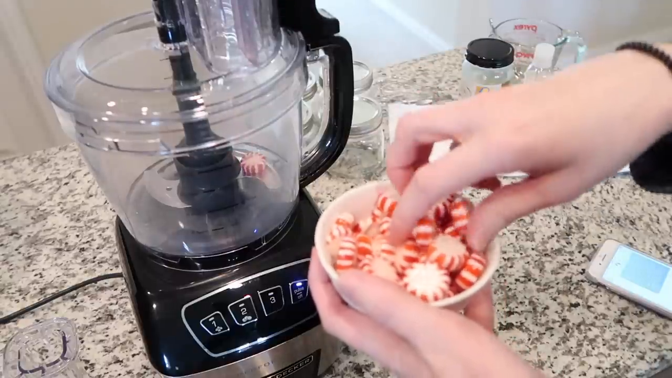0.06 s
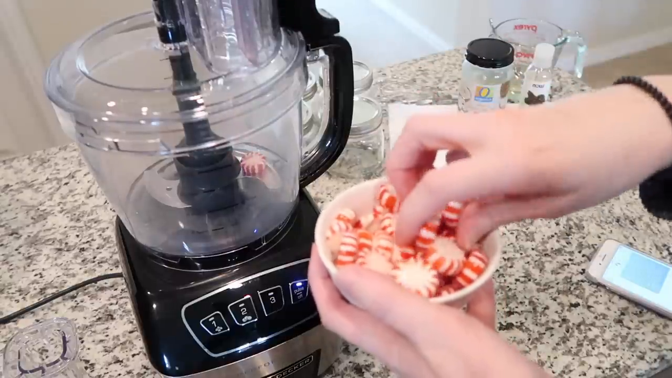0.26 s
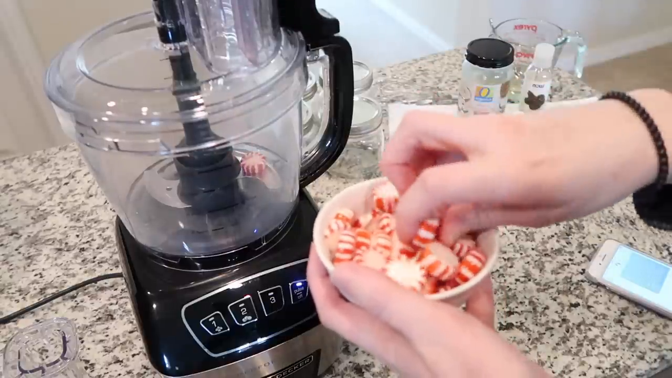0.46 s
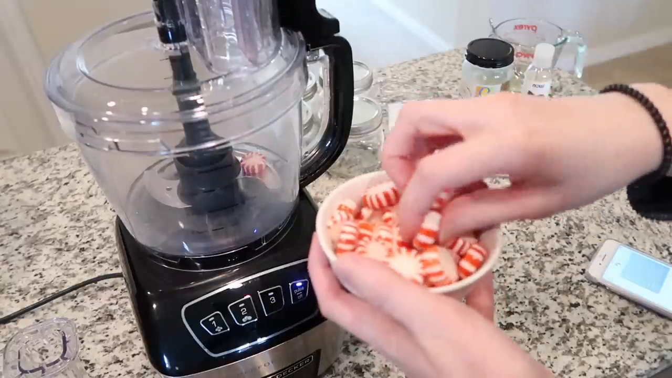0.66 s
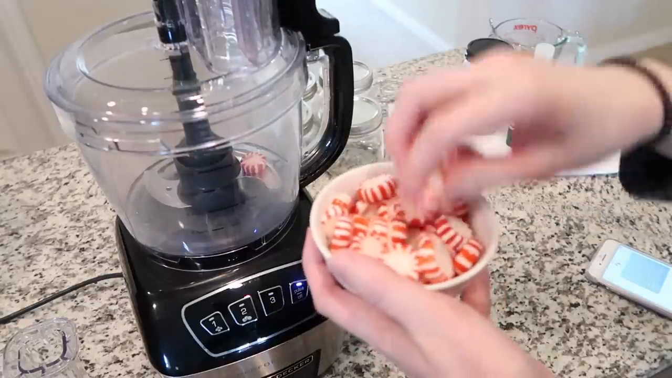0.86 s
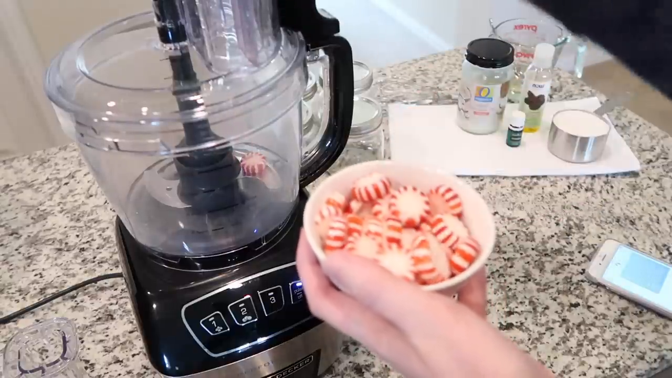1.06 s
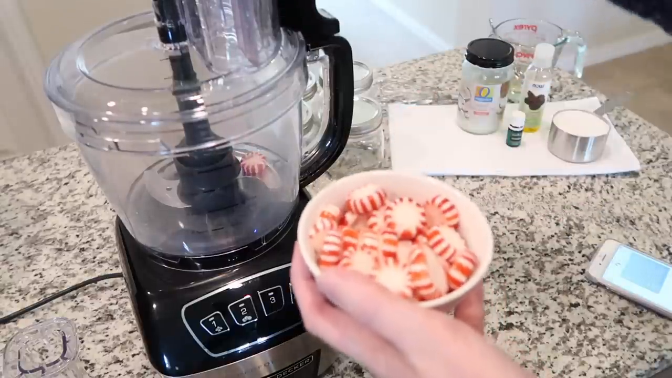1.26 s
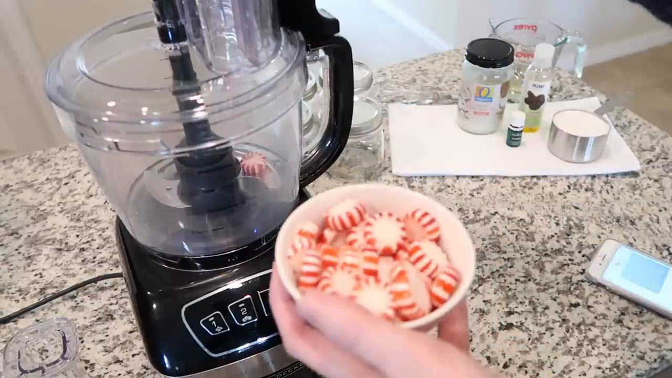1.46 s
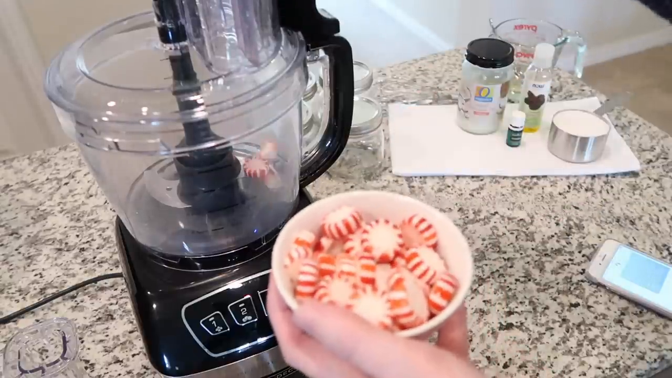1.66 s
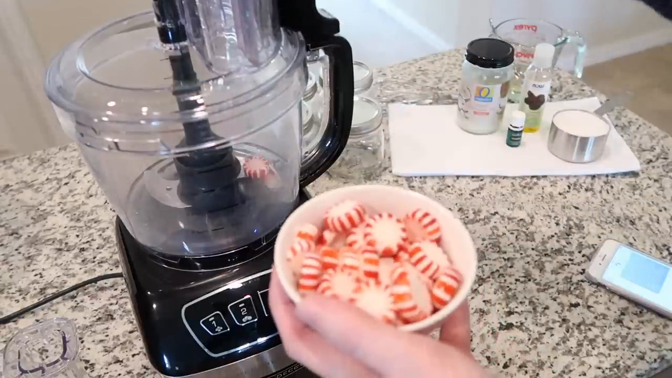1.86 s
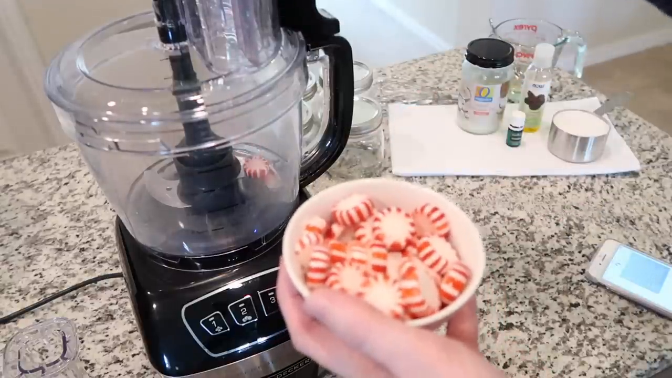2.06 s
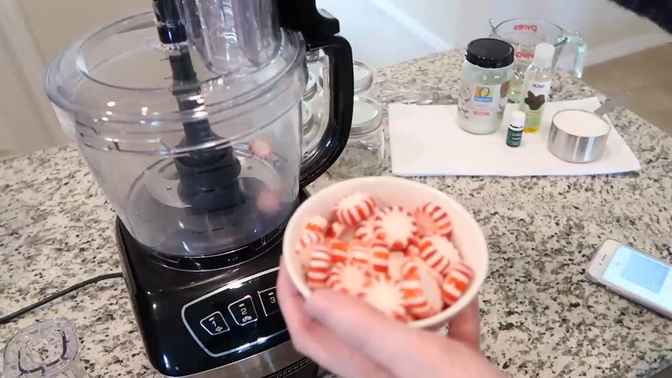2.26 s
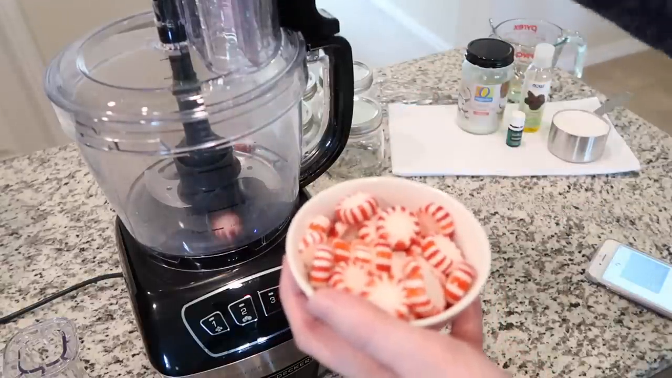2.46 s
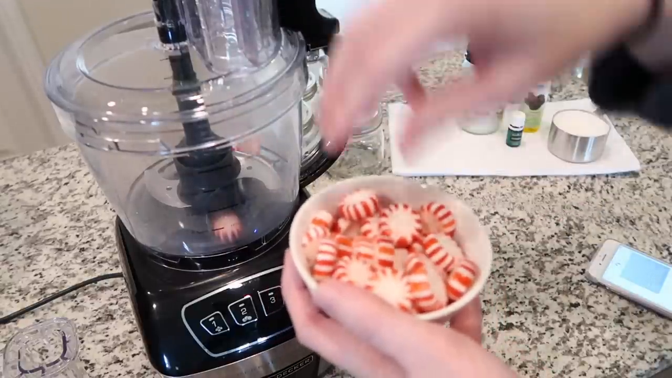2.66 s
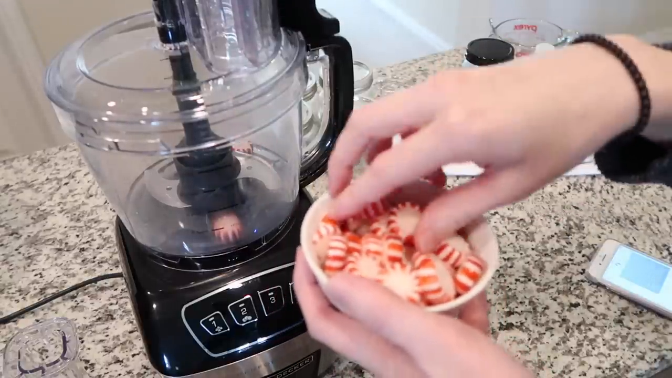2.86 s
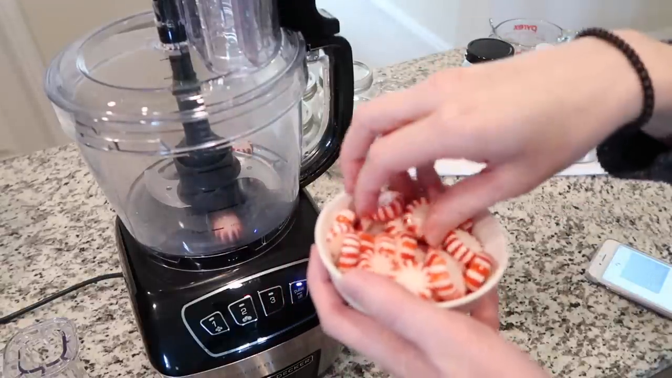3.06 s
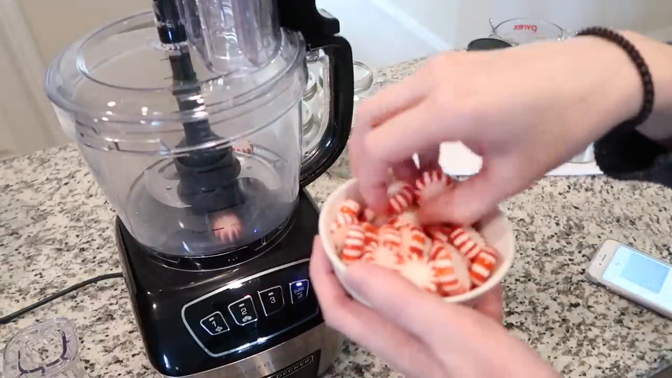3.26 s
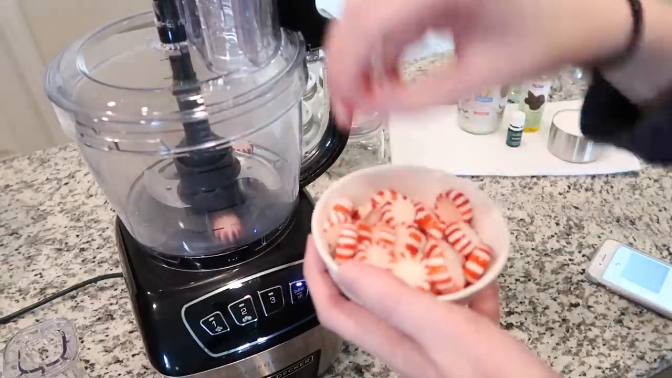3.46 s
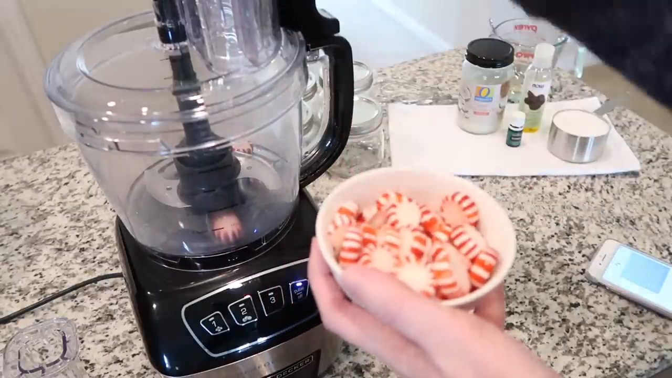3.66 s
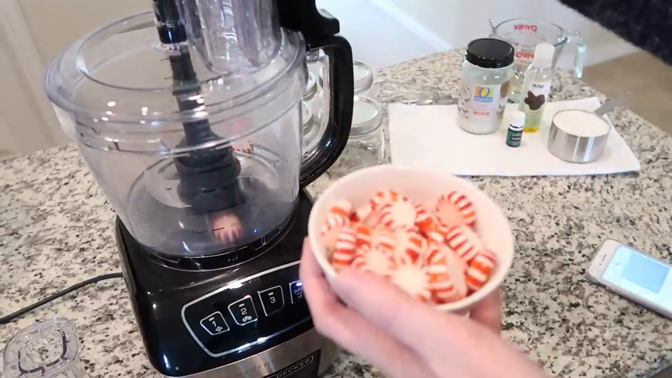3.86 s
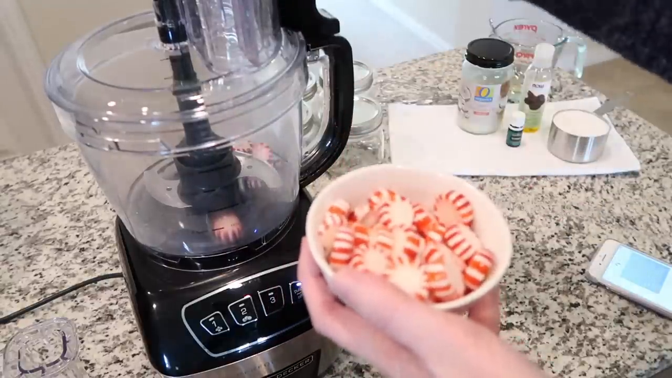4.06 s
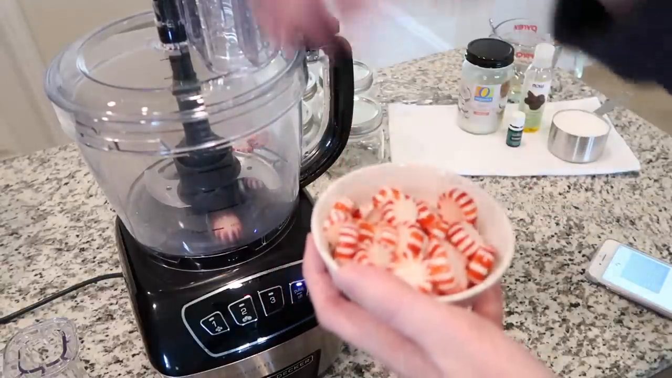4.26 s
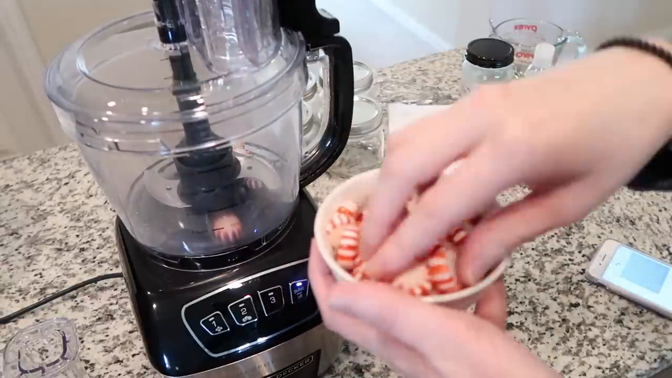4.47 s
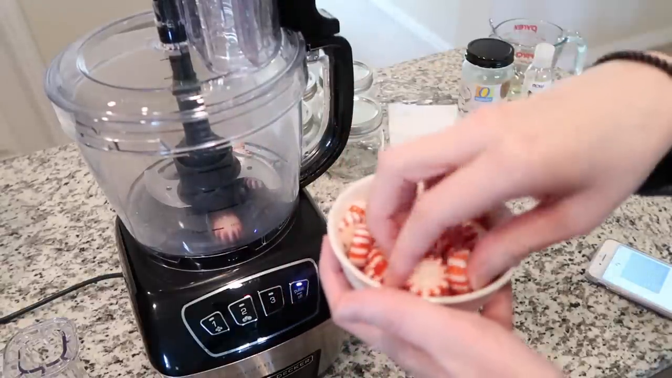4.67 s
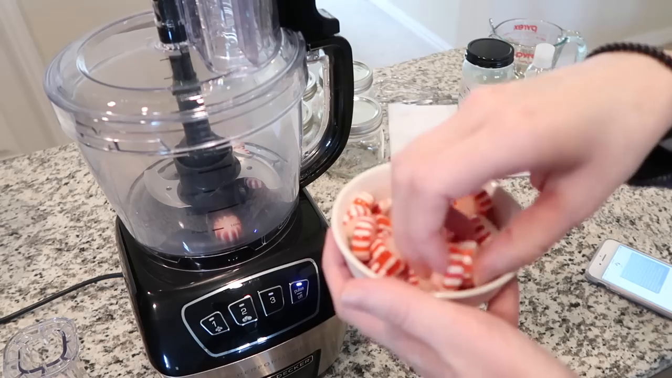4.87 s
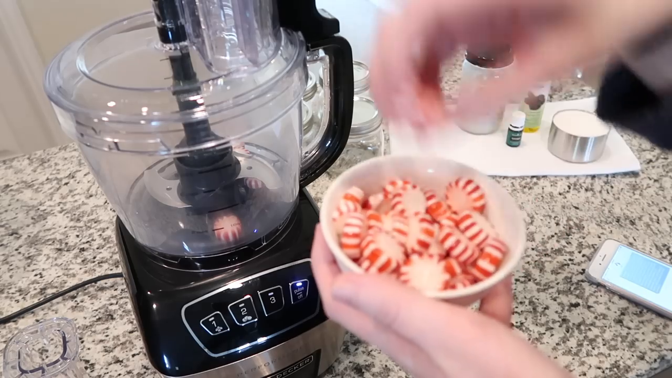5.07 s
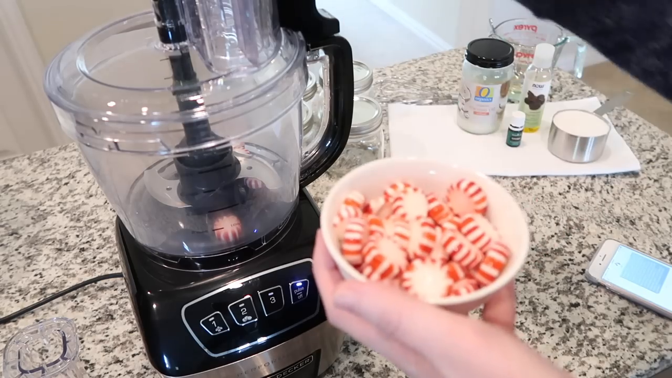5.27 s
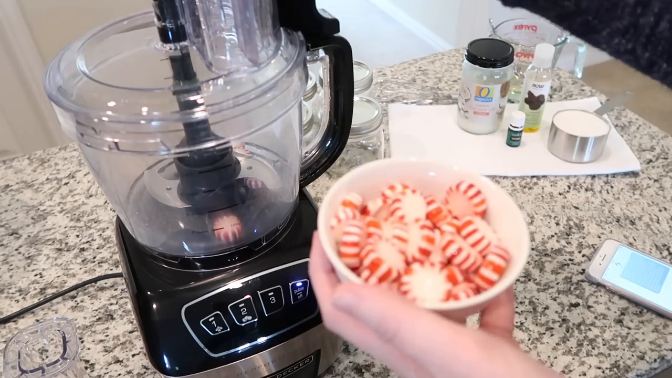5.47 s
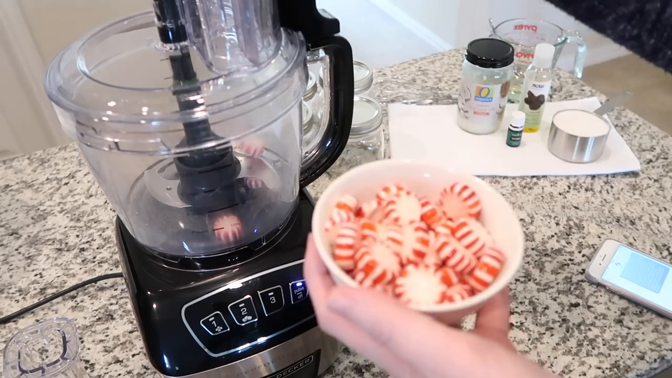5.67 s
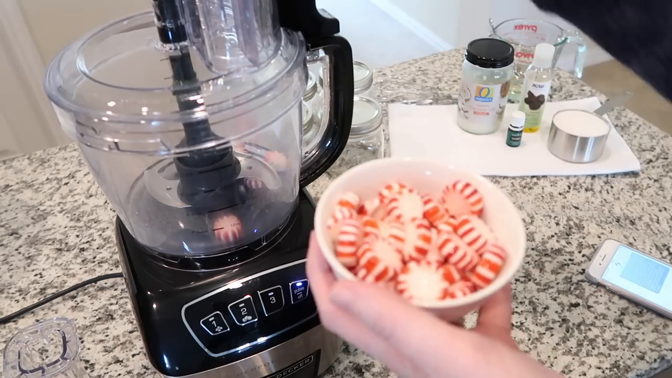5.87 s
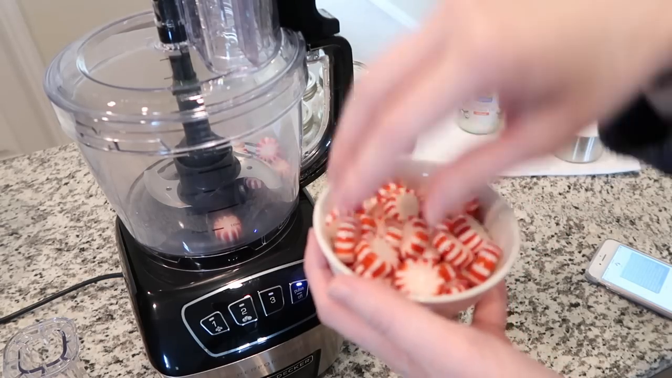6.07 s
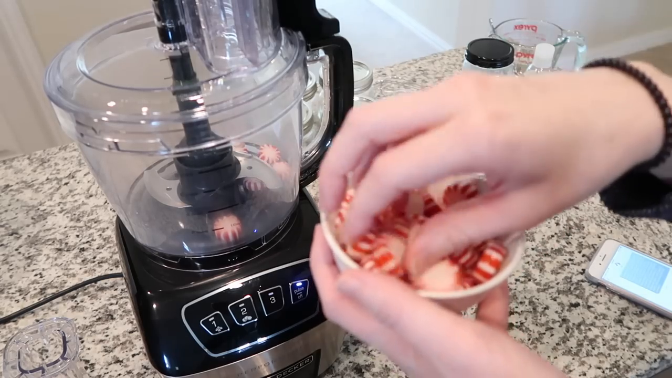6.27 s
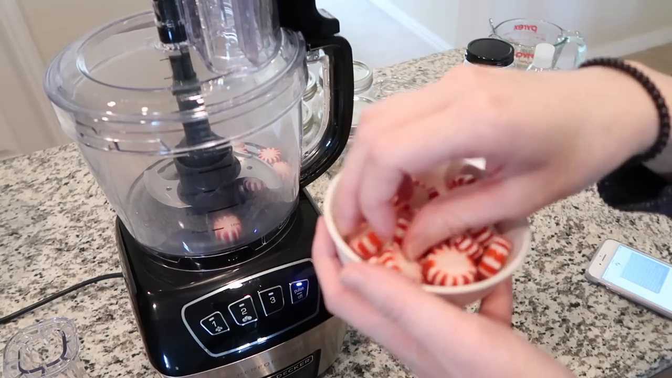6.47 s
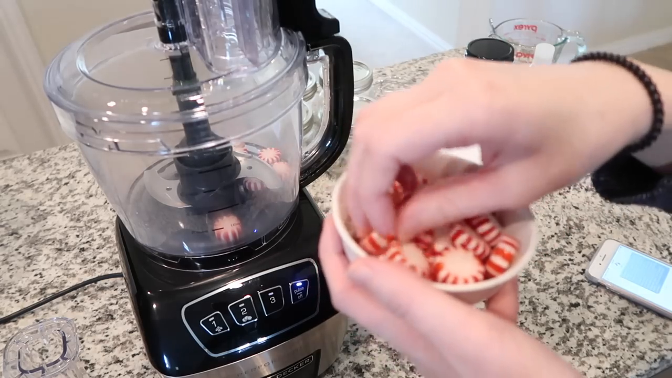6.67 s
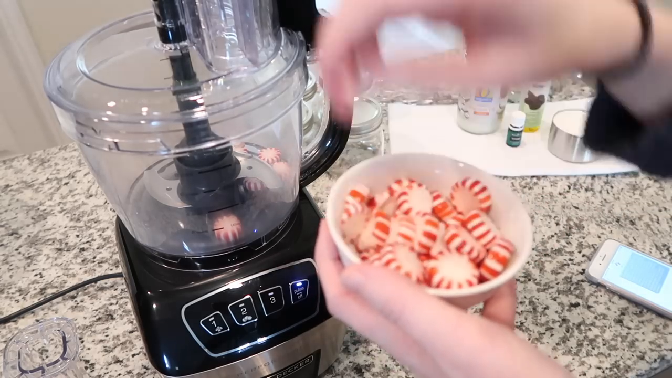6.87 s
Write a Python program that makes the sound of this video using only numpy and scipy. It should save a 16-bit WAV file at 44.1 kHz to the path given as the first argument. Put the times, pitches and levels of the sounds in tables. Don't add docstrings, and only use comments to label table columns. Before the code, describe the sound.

Hard candies drop one by one into a thick plastic mixing bowl, clacking, bouncing and rattling to rest, with light candy clicks between drops.

```python
import sys
import numpy as np
from scipy import signal
from scipy.fft import rfft, irfft, next_fast_len
from scipy.io import wavfile

SR = 44100
rng = np.random.default_rng(int(sys.argv[2]) if len(sys.argv) > 2 else 0)


def pcm_store(signal):
    levels = np.round(np.clip(np.atleast_2d(signal), -1, 1) * 32767)
    wavfile.write(sys.argv[1], SR, levels.astype(np.int16).T)


def to_linear_factor(level_db):
    exponent = np.asarray(level_db, float) / 20
    return 10 ** exponent


N = 305613

# pitch in Hz, level in dB, t60 in seconds.
BOWL_MODES = [(520, -14, .08), (640, -9, .1), (719, -7, .1), (793, -7, .11), (904, -6, .12),
              (1027, -5, .12), (1130, -5, .1), (1221, -3, .1), (1300, -7, .07), (1371, -4, .1),
              (1490, -6, .09), (1670, -7, .09), (1782, -6, .09), (1950, -7, .08), (2200, -6, .08),
              (2362, -3, .08), (2479, -4, .08), (2610, -5, .07), (2800, -8, .07), (2980, -9, .07),
              (3261, -8, .08), (3570, -8, .08), (3870, -13, .06), (4400, -15, .06), (5280, -17, .035),
              (6200, -19, .03), (6700, -18, .03), (7300, -20, .03), (9300, -20, .03)]
# pitch in Hz, level in dB, t60 in seconds.
BOWL_AIR = (347, -25.5, 0.22)


def rms_one(x):
    return x / np.sqrt(np.mean(x ** 2) + 1e-20)


def band_pass(x, low_hz, high_hz, order=2):
    return signal.sosfilt(signal.butter(order, [low_hz, high_hz], "band", fs=SR, output="sos"), x)


def low_pass(x, hz, order=2):
    return signal.sosfilt(signal.butter(order, hz, fs=SR, output="sos"), x)


def at_hz(points, hz):
    table_hz, values = np.array(points).T
    return np.interp(np.log(hz), np.log(table_hz), values)


def in_time(rows):
    s, db = np.transpose(rows)
    return to_linear_factor(np.interp(np.arange(N) / SR, s, db, left=-200, right=-200))


def spells(rows, rise_db_per_s, fall_db_per_s):
    t = np.arange(0, N + 64, 64) / SR
    power = 0
    for s, length, db in rows:
        rise_db = rise_db_per_s * np.clip(s - t, 0, 1)
        fall_db = fall_db_per_s * np.clip(t - s - length, 0, 1)
        power = power + to_linear_factor(2 * (db - rise_db - fall_db))
    return np.interp(np.arange(N) / SR, t, np.sqrt(power))


def bands(low_hz, channels=1):
    edges_hz = 25 * 2 ** np.arange(0, 9.6, .5)
    white = rng.standard_normal((2, channels, N))
    for k, (low, high) in enumerate(zip(edges_hz, edges_hz[1:])):
        if low >= low_hz:
            yield np.sqrt(low * high), band_pass(white[k % 2], low, high)


def ring(clicks, hz, t60):
    r = to_linear_factor(-60 / (t60 * SR))
    w = 2 * np.pi * hz / SR
    return signal.lfilter([0, np.sin(w)], [1, -2 * r * np.cos(w), r * r], clicks + 1e-18)


def train(s, size):
    clicks = np.zeros(N)
    np.add.at(clicks, np.minimum((s * SR).astype(int), N - 1), size)
    return clicks


def colour_db(hz, favoured_hz, bright_db, lift_db, octaves, usual_db, floor_db=0):
    lift = lift_db * np.exp(-(np.log2(hz / favoured_hz) / octaves) ** 2)
    mids_lost = 1.03 * np.exp(-(np.log2(hz / 2200) / 0.64) ** 2)
    lows = floor_db * (np.clip(np.log2(1300 / hz), 0, 1) - mids_lost)
    top = (bright_db - usual_db) * np.clip(np.log2(hz / 2600), 0, 1)
    return lift + lows + top


def strike(s, peak_db, modes, colour, spread_s, scatter_db, detune=0):
    hz, level_db, t60 = np.transpose(modes)
    shape = (len(s), len(hz))
    size = to_linear_factor(level_db + colour(hz[None]) + scatter_db * rng.standard_normal(shape))
    size = size / np.sqrt(np.sum(size ** 2, axis=1, keepdims=True)) * to_linear_factor(peak_db)[:, None]
    size = size * np.sign(rng.random(shape) - .5)
    when = s[:, None] + spread_s * rng.random(shape)
    loading = rng.integers(-1, 2, shape) if detune else np.zeros(shape)
    out = 0
    for k in range(len(hz)):
        for j in np.unique(loading):
            clicks = train(when[:, k], size[:, k] * (loading[:, k] == j))
            out = out + ring(clicks, hz[k] * (1 + detune * j), t60[k])
    return out


def clatter(s, peak_db, colour, stretch, rise_s):
    # frequency in Hz, level in dB.
    dense_levels = [(240, -45), (400, -10), (1230, 1.5), (1570, -8.5), (2310, -2), (5910, -16.5),
                    (6690, -24.5), (11300, -26), (15800, -44)]
    # frequency in Hz, t60 in seconds.
    dense_t60 = [(400, 0.071), (1200, 0.3), (3000, 0.14), (7000, 0.064), (15000, 0.045)]
    out = 0
    soften = np.exp(-1 / (rise_s * SR))
    for hz, noise in bands(low_hz=390):
        power = to_linear_factor(2 * (peak_db + at_hz(dense_levels, hz) + colour(hz).ravel()))
        fade = to_linear_factor(-120 / (stretch * at_hz(dense_t60, hz) * SR))
        energy = signal.lfilter([1], [1, -fade], train(s, power) + 1e-18)
        out = out + noise[0] * np.sqrt(signal.lfilter([1 - soften], [1, -soften], energy))
    return out


def crack(s, db, low_hz, high_hz):
    fade = np.exp(-1 / (0.00052 * SR))
    burst = signal.lfilter([1], [1, -fade], train(s, to_linear_factor(db)) + 1e-18) * rng.standard_normal(N)
    return band_pass(burst, low_hz, high_hz)


def thump(s, db):
    # pitch in Hz, level in dB, t60 in seconds.
    base_modes = [(125, -3.5, .3), (152, -4.5, .13), (199, -5, .09), (230, -1, .15), (290, -20, 0.03),
                  (370, -4, 0.031), (482, -7, 0.032)]
    push = strike(s, db, base_modes, lambda hz: 0 * hz, spread_s=.003, scatter_db=1.5)
    return to_linear_factor(1.0) * low_pass(push, 700)


def knocks_in_bowl():
    # start in seconds, peak
    # in dB, # thump of the base in dB re peak, favoured pitch in Hz, brightness in dB re peak.
    landings = [(0.065, -15.5, -60, 1370, -23), (0.109, -13.5, -60, 1370, -25),
                (0.133, -16.5, -60, 1400, -17), (1.537, -34.5, -7, 1010, -32), (1.617, 0, -13, 1260, -13),
                (2.045, -11.5, -24.5, 3300, -18.5), (2.229, -20, -8, 918, -19),
                (2.244, -1, -10.5, 1130, -14), (2.31, -17, -7.5, 904, -10), (2.379, -6, -29.5, 2544, -18),
                (2.661, 2, -25, 1280, -18.5), (3.979, 0, -17, 1200, -12), (4.31, -7.5, -16.5, 1410, -17),
                (4.332, -26, 3.5, 730, -11), (5.763, 0, -16, 750, -7.5), (5.997, -2.5, -16, 3370, -9),
                (6.452, -11.5, -35, 3480, -21)]
    # start in seconds, peak in dB, favoured pitch in Hz, brightness in dB re peak.
    wall_bounces = [(0.047, -18.5, 1480, -24.5), (1.706, -2, 1267, -21), (1.793, -18.5, 3290, -12.5),
                    (1.883, -11.5, 1130, -22.5), (1.955, -14, 2260, -21.5), (2.354, -10, 2210, -22.5),
                    (2.362, -2, 2470, -15), (2.43, -14, 1170, -10), (2.45, -4.5, 2350, -16.5),
                    (2.527, -14.5, 2320, -28.5), (2.565, -13, 2420, -16), (2.822, -7, 1300, -19),
                    (2.94, -25, 2280, -24.5), (4.015, 2, 2420, -13.5), (4.36, -11.5, 1346, -14.5),
                    (4.4, -11, 1230, -14.5), (4.48, -17.5, 2330, -34), (5.842, -6, 1400, -19.5),
                    (5.899, -5, 2650, -15), (5.937, -9, 1420, -12.5), (5.981, -14, 1720, -7.5),
                    (6.057, -5.5, 1370, -18), (6.086, -10.5, 1340, -15), (6.162, -3.5, 1550, -13.5),
                    (6.187, -18, 1740, -8.5), (6.341, -16.5, 2270, -16)]
    # start in seconds, peak in dB.
    low_hops = [(1.739, -15.5), (1.761, -16.5), (2.012, -17), (2.064, -17), (2.106, -15.5), (2.137, -20.5),
                (2.178, -30), (2.476, -13.5), (2.611, -12.5), (2.731, -9.5), (2.766, -11.5), (2.848, -18.5),
                (2.868, -12), (2.894, -12), (3.011, -26.5), (4.057, -15), (4.061, -15), (4.072, -15),
                (4.173, -19), (4.239, -25), (4.432, -18.5), (4.516, -25.5), (6.228, -14), (6.263, -10.5),
                (6.297, -16)]
    # start in seconds, peak in dB.
    touches = [(1.6125, -26.5), (2.009, -19), (2.052, -19.5), (2.071, -18.5), (2.118, -18.5),
               (2.145, -24.5), (2.156, -28), (2.207, -29.5), (2.388, -8), (2.654, -15.5), (2.658, -13.5),
               (2.672, -8.5), (2.832, -16.5), (2.851, -28.5), (2.891, -15.5), (5.995, -13.5),
               (6.022, -15.5), (6.109, -21), (6.175, -14.5), (6.233, -14.5), (6.249, -17), (.002, -19.5),
               (0.013, -24.5), (.058, -19.5), (.07, -18), (.104, -19), (.217, -27.5), (1.701, -24),
               (1.803, -17), (1.81, -19.5), (2.578, -19), (2.508, -17.5), (4.012, -12.5), (4.372, -13.5),
               (4.412, -16), (4.42, -16), (4.449, -19), (4.49, -21), (0.121, -20.5), (.155, -25),
               (.142, -19.5)]
    wall_thump_db, hop_thump_db = -46, -42
    bounces = [(s, db, wall_thump_db, hz, bright) for s, db, hz, bright in wall_bounces]
    hops = []
    for s, db in low_hops + touches:
        hz = 1310 * 2 ** (.45 * abs(rng.standard_normal()))
        bright = -21.5 - 2.5 * rng.standard_normal()
        hops.append((s, db, hop_thump_db, hz, bright))
    return np.transpose(landings + bounces + hops)


def air_inside(s, db, rolling_gain):
    hz, level_db, t60 = BOWL_AIR
    pushes = train(s, to_linear_factor(1.07 * db + level_db) * rng.choice([-1, 1], len(s)))
    pushes += to_linear_factor(-49.0) * rolling_gain * rng.standard_normal(N)
    return ring(pushes, hz, t60) - ring(pushes, hz, 0.085)


def trembling(rolling_gain):
    touched = rng.random(N) < 700 / SR
    strength = to_linear_factor(3.5 * np.minimum(rng.exponential(1, N), 5))
    touches = touched * strength * rng.choice([-1, 1], N)
    dealt = rng.integers(0, 6, N)
    rolling = 0
    for k, (hz, db, t60) in enumerate(BOWL_MODES[:25]):
        rolling = rolling + to_linear_factor(db) * ring(touches * (dealt == k % 6), hz, .35 * t60)
    return to_linear_factor(-14) * rolling_gain * rms_one(rolling)


def bowl():
    # start in seconds, length in seconds, level in dB.
    rolls = [(0, 0.058, -23), (.45, 0.17, -36), (1.39, 0.016, -44), (1.79, 0.009, -29), (1.93, .4, -34),
             (2.42, .18, -18.5), (2.76, 0.2, -34.5), (3.8, 0.25, -49), (4.07, 0.16, -28),
             (4.34, 0.081, -19.5), (4.73, 0.28, -49), (5.45, 0.22, -50.5), (5.88, 0.16, -20),
             (6.14, 0.21, -20.5), (6.47, 0.031, -23), (6.75, 0.032, -34)]
    # pitch in Hz, level in dB, t60 in seconds.
    floor_modes = [(2353, -7, .04), (3590, 0, .06), (3898, -8, .04), (5100, -10, .03), (5300, -11, .025),
                   (6290, -8, .025), (6545, -2, .03), (7050, -8, .03), (7870, -6, .02), (9300, -8, .015)]
    s, db, thump_db, hz, bright = knocks_in_bowl()
    rolling_gain = spells(rolls, rise_db_per_s=300, fall_db_per_s=120)
    on_floor = 0.7 * np.clip(thump_db + 22.5, -8, 18)[:, None]

    def colour(f):
        return colour_db(f, hz[:, None], bright[:, None], lift_db=6.5, octaves=0.2, usual_db=-24, floor_db=on_floor)

    wobble_s = .00035 * np.clip(-6 - db, 0, 12)[:, None]
    clack = [(f, level, .17 * t60) for f, level, t60 in BOWL_MODES]
    knocks = strike(s, db + .3, clack, colour, spread_s=.002 + wobble_s, scatter_db=4.0, detune=.03)
    knocks += strike(s, db - 13.5, BOWL_MODES, colour, spread_s=.006 + wobble_s, scatter_db=4.5, detune=.006)
    hard = (thump_db > -20) & (db > -10)
    knocks += strike(s[hard], (db + bright)[hard], floor_modes, lambda f: 0 * f, spread_s=.003, scatter_db=5.5)
    knocks += clatter(s, db - 8.5 - 2.7 * hard, colour, stretch=0.78, rise_s=0.0017)
    knocks += crack(s, db + bright + .3 * np.clip(db, -30, 0), 4100, 15000)
    air = air_inside(s, db + np.clip(thump_db + 43.5, -12, 0), rolling_gain)
    return knocks + air + thump(s, db + thump_db) + trembling(rolling_gain)


def background():
    # frequency in Hz, level in dB.
    hiss_colour = [(15, -42), (25, -20.5), (49, -17), (276, -7.5), (382, -10), (461, -10), (858, -15.5),
                   (1010, -11), (3130, -19), (5990, -26), (9000, -30.5), (11800, -28), (13800, -42),
                   (15800, -73)]
    # frequency in Hz, left-right likeness of the hiss (held between -0.5 and 1 when used).
    likeness = [(60, 1.1), (240, 0.66), (950, -2.9), (3770, 0.28), (15000, -0.51)]
    # time in seconds, level in dB.
    traffic = [(0.0, -74), (1.0, -61), (1.8, -66), (2.33, -63), (2.9, -72), (4.0, -65.5), (5.46, -59.5),
               (6.1, -59), (6.93, -56)]
    # hum pitch in Hz, level in dB.
    hum_tones = [(59.5, -71.5), (119, -70)]
    hiss = 0
    for hz, (mid, side) in bands(low_hz=20, channels=2):
        alike = np.clip(at_hz(likeness, hz), -.5, 1)
        stereo = np.sqrt(1 + alike) * mid + np.sqrt(1 - alike) * side * [[1], [-1]]
        hiss = hiss + to_linear_factor(at_hz(hiss_colour, hz)) * stereo
    hiss = low_pass(rms_one(hiss), 13000, order=8)
    rumble = rms_one(band_pass(rng.standard_normal(N), 28, 110, order=3))
    drone = rms_one(band_pass(rng.standard_normal(N), 130, 520))
    hum = sum(to_linear_factor(db - 2.5) * np.sin(2 * np.pi * hz * np.arange(N) / SR) for hz, db in hum_tones)
    return to_linear_factor(-55) * hiss + in_time(traffic) * (rumble + to_linear_factor(-3.5) * drone) + hum


def dish():
    # start in seconds, peak in dB, favoured pitch in Hz, brightness in dB re peak.
    clicks = [(0.2009, -23.5, 2200, -16.5), (0.24, -26, 4000, -15.5), (0.372, -17, 3100, -6),
              (0.5795, -21, 1490, -16), (0.608, -15.5, 1500, -20.5), (0.6509, -13, 2560, -14.5),
              (.664, -29, 4450, -18), (0.836, -28.5, 3900, -18), (3.236, -33.5, 2700, -25),
              (3.325, -33.5, 1600, -20), (3.35, -17, 4400, 0), (3.3743, -26.5, 4350, -11.5),
              (3.4436, -32, 1510, -26), (3.474, -36, 4780, 6), (4.7018, -23.5, 2900, -18),
              (4.7081, -27, 2480, -18), (4.7179, -24, 4900, -22), (4.9793, -17, 2760, -15.5),
              (5.0757, -28, 2460, -17), (5.0909, -28, 2295, -15.5), (6.4, -13.5, 1490, -10.5),
              (6.459, -19.5, 1870, -21), (6.5112, -17.5, 3200, -24), (6.5277, -16, 7040, -8.5),
              (6.5363, -21, 2100, -16), (6.7885, -17, 3750, -22), (6.8593, -35, 2580, 3)]
    # start in seconds, peak in dB.
    nudges = [(0.2925, -36), (0.4006, -28), (0.439, -35), (0.4525, -32), (0.5206, -30), (0.567, -27),
              (0.633, -24), (0.815, -33.5), (0.918, -35.5), (3.0312, -27), (3.119, -34), (3.1374, -36),
              (3.1552, -39), (3.1897, -36), (3.2528, -43), (3.299, -41), (3.267, -40), (3.3063, -36),
              (3.32, -37), (3.36, -34.5), (3.388, -35), (3.414, -38), (.367, -34.5), (3.4874, -38),
              (4.661, -28.5), (4.767, -39), (4.85, -36.5), (4.9066, -28), (4.922, -31), (4.937, -29),
              (5.049, -55), (6.726, -34.5), (6.7522, -29), (6.813, -29)]
    # pitch of a dish mode in Hz, level in dB.
    dish_modes = [(1500, 4.5), (1700, -15), (2050, 3.5), (2600, 4.5), (3000, 2), (3600, 8), (4450, 10),
                  (5600, 4.5), (6900, 3.5), (8000, -1), (9500, -21), (11500, -23)]
    nudge_hz, nudge_bright_db = 1600, -26.5
    soft_clicks = [(s, db, nudge_hz, nudge_bright_db) for s, db in nudges]
    s, db, hz, bright = np.transpose(clicks + soft_clicks)

    def colour(f):
        return colour_db(f, hz[:, None], bright[:, None], lift_db=5, octaves=.4, usual_db=-12)

    dry_modes = [(f, level, .007) for f, level in dish_modes]
    ticks = strike(s, db + 0.5, dry_modes, colour, spread_s=0.0018, scatter_db=1.0, detune=0.054)
    ticks += crack(s, db + bright + 5.5, 1800, 10000)
    ticks += clatter(s, db - 13, colour, stretch=0.7, rise_s=0.00015)
    return band_pass(ticks, 950, 11000) + rim()


def rim():
    # start in seconds, level in dB.
    rim_ticks = [
        (0.652, -40.5),
        (3.352, -54.5),
        (4.706, -48.5),
        (4.982, -46.5),
    ]
    # centre in Hz, width in Hz, t60 in seconds.
    rim_cluster = (4500, 520, 0.4)
    s, db = np.transpose(rim_ticks)
    hz, width_hz, t60 = rim_cluster
    dying = signal.lfilter([1], [1, -to_linear_factor(-60 / (t60 * SR))], train(s, to_linear_factor(db)) + 1e-18)
    return dying * rms_one(band_pass(rng.standard_normal(N), hz - width_hz / 2, hz + width_hz / 2))


def chute():
    # start in seconds, peak in dB, thump of the base in dB re peak.
    clinks = [
        (1.338, -2, -35),
    ]
    # pitch of a lip mode in Hz, level in dB, t60 in seconds.
    lip_modes = [(540, -12, .1), (646, -9, .12), (912, -5, .05), (1050, -12, .06), (1787, -15, .12),
                 (2283, -14, .08), (2555, -10, .07), (3012, -11, .12), (3255, -11, .1), (3345, -1, .13),
                 (4130, -5, .035), (4260, -1.5, .035), (4400, -4, .045), (5469, -14, .07)]
    # start in seconds, peak in dB, favoured pitch in Hz, brightness in dB re peak.
    tube_knocks = [
        (1.486, -32, 1070, -22),
        (3.8888, -14.5, 2550, -6),
        (3.894, -10, 1754, -9.5),
        (5.634, -25, 2540, -15),
        (5.641, -18.5, 2460, -17),
        (5.67, -24, 2520, -23),
        (5.684, -22, 1770, -12.5),
    ]
    # pitch of a tube mode in Hz, level in dB, t60 in seconds.
    tube_modes = [(920, -17, .08), (1130, -8.5, 0.072), (1500, -16, .07), (1720, -4.5, 0.097),
                  (2420, -8, .07), (2584, -4.5, 0.062), (3220, -8.5, .07), (3770, -13.5, 0.08),
                  (4400, -17.5, .06), (7160, -31, 0.066)]
    air_hz, _, air_t60 = BOWL_AIR

    s, db, thump_db = np.transpose(clinks)
    lip = strike(s, db - 12.0, lip_modes, lambda f: 0 * f, spread_s=0.0033, scatter_db=4.0)
    lip += clatter(s, db - 21.5, lambda f: np.array([5.9 * np.log2(f / 1000)]), stretch=0.88, rise_s=0.00058)
    lip += thump(s, db + thump_db) + ring(train(s, to_linear_factor(db - 40)), air_hz, air_t60)

    s, db, hz, bright = np.transpose(tube_knocks)

    def colour(f):
        return colour_db(f, hz[:, None], bright[:, None], lift_db=6.5, octaves=0.15, usual_db=-24.0)

    short_modes = [(f, level, min(t60, .045)) for f, level, t60 in tube_modes]
    tube = strike(s, db - 4, short_modes, colour, spread_s=.005, scatter_db=2.5, detune=.02)
    tube += clatter(s, db - 0.5, colour, stretch=0.26, rise_s=0.0037)
    tube += thump(s, db - 31.5) + ring(train(s, to_linear_factor(db - 28.0)), air_hz, air_t60)
    return tube + lip


def hand():
    # start in seconds, length in seconds, level in dB.
    lid_bumps = [
        (3.562, 0.0041, -55),
        (3.65, 0.39, -61.5),
        (5.432, 0.038, -46),
        (5.49, 0.0071, -63),
    ]
    skin = rng.standard_normal(N)
    dull = rms_one(band_pass(skin, 110, 600))
    lid = rms_one(ring(skin, 1050, 0.013))
    gain = spells(lid_bumps, rise_db_per_s=1100, fall_db_per_s=175)
    return gain * (dull + to_linear_factor(-6.5) * lid + to_linear_factor(-9.5) * skin)


def kitchen(x):
    # frequency in Hz, t60 in seconds.
    kitchen_t60 = [(100, 0.037), (1000, 0.58), (4000, 0.4), (14000, 0.33)]
    t = np.arange(SR // 2) / SR
    answer = 0
    for hz, (mid, side) in bands(low_hz=90, channels=2):
        apart = np.clip(0.27 * hz / 2500, .03, .9)
        noise = mid[SR:SR + len(t)] + apart * side[SR:SR + len(t)] * [[1], [-1]]
        noise = noise * np.clip(hz / 600, 0, 1)
        answer = answer + noise * to_linear_factor(-60 * t / at_hz(kitchen_t60, hz))
    answer = answer * np.clip(t / 0.0052 - .3, 0, 1)
    return signal.fftconvolve(x[None], answer / np.sqrt(np.sum(answer ** 2) / 2), axes=1)[:, :N]


def placed(x, pan_db, lag_samples):
    size = next_fast_len(N)
    turns = np.arange(size // 2 + 1) / size * lag_samples
    late = irfft(rfft(x, size) * np.exp(-2j * np.pi * turns), size)[:N]
    return np.array([x * to_linear_factor(pan_db / 2), late * to_linear_factor(-pan_db / 2)])


def scene():
    plastic = bowl() + hand()
    sweets = dish()
    tube = chute()
    direct = placed(plastic, 0.59, 0.9) + placed(tube, .4, 0.96) + placed(sweets, -0.47, 0.65)
    echo = low_pass(kitchen(plastic + tube + sweets), 11500, order=6)
    near = direct + to_linear_factor(-7.0) * echo
    return signal.sosfilt(signal.butter(8, 104, "high", fs=SR, output="sos"), near) + background()


def top_cut(x):
    return signal.sosfilt(signal.butter(12, 15980, fs=SR, output="sos"), x)


def record(dry):
    presence = band_pass(dry, 8800, 10500, order=1)
    heard = low_pass(dry + 0.05 * presence, 15500)
    return top_cut(np.clip(heard, -1, 1))


dry = scene()
out = record(dry)
pcm_store(out)
```